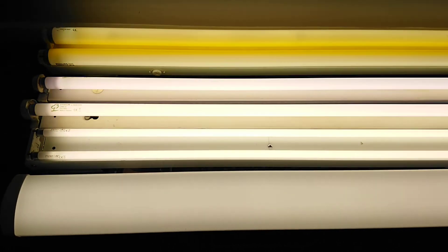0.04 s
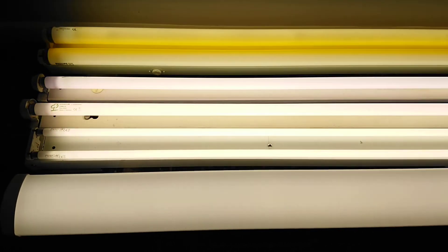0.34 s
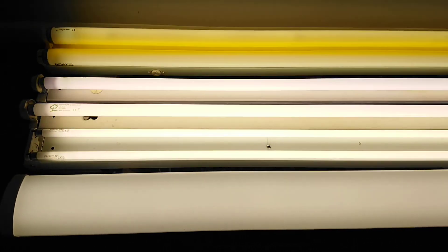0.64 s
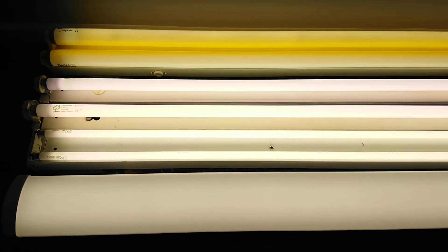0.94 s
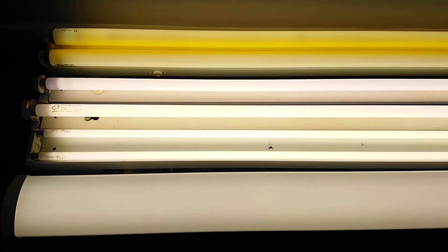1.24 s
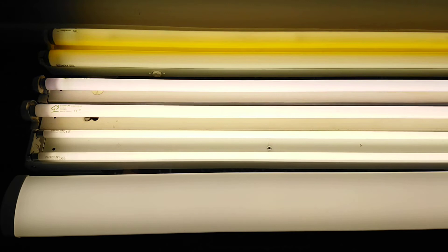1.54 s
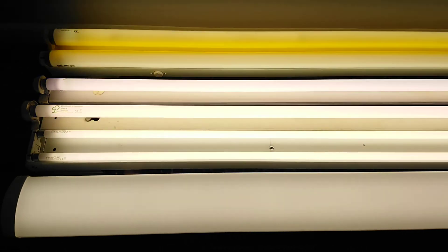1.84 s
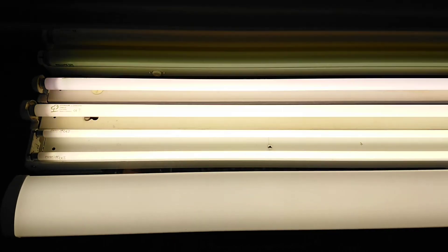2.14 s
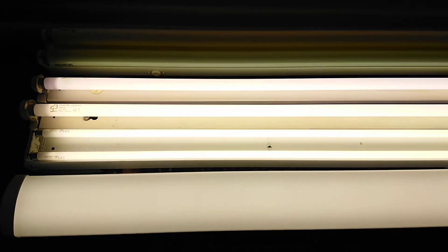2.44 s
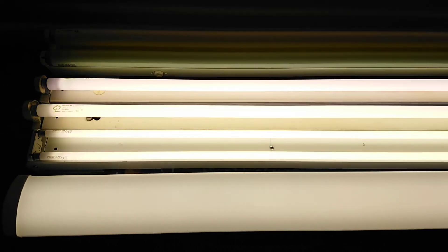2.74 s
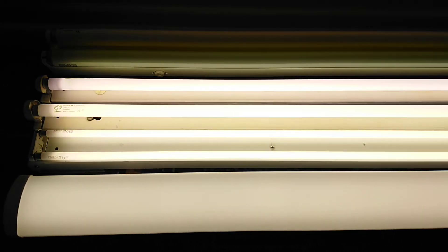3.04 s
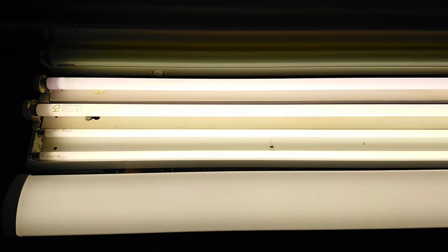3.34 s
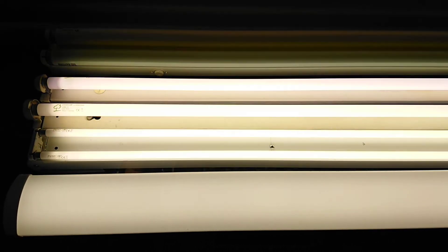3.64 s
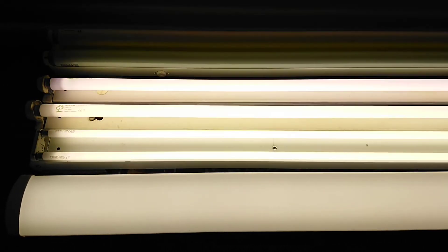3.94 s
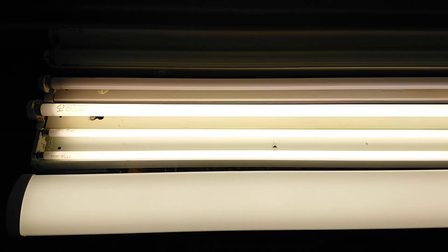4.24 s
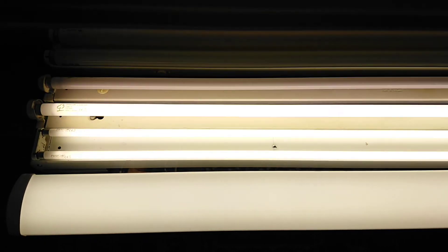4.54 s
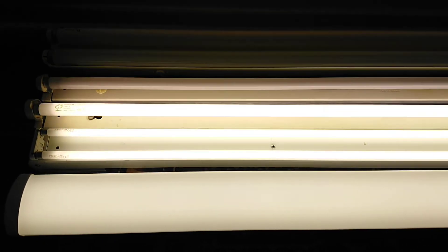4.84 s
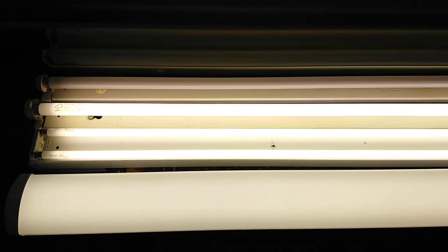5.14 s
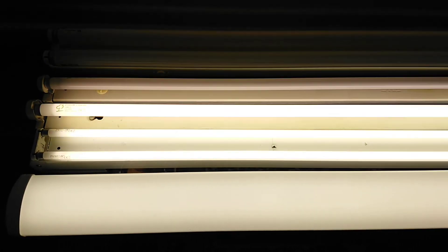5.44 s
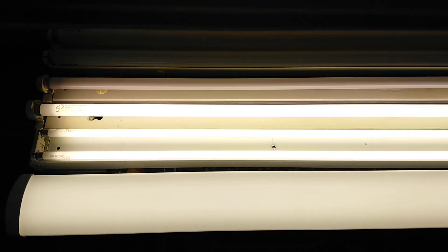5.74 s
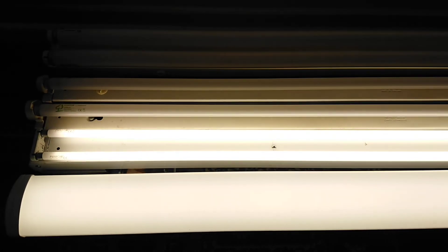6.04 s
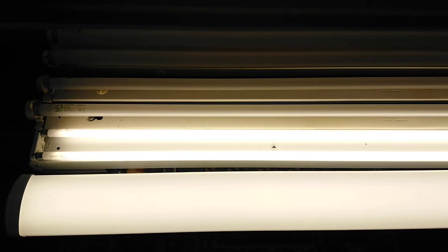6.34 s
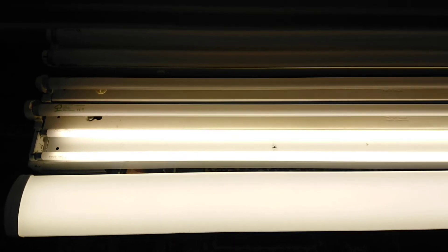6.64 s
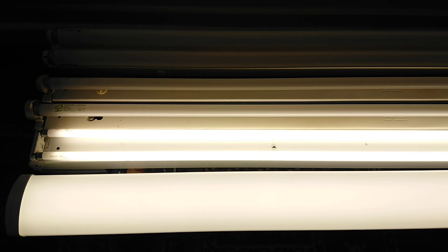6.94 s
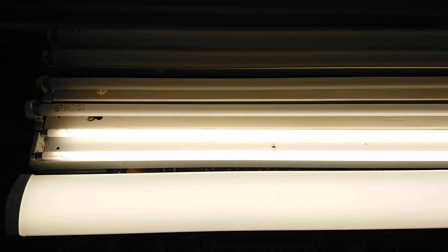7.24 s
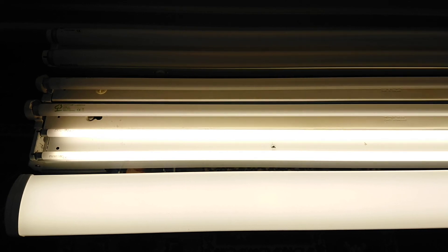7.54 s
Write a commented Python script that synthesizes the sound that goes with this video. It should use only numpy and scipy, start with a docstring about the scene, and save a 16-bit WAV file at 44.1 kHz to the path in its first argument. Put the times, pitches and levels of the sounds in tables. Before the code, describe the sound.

Close by in a small room, fingers brush a switch panel and a rocker switch snaps loudly with a short echo. A few seconds later a hand knocks lightly on the panel and a toggle switch clicks over twice, its spring ringing briefly each time. Behind it all lie a quiet fluorescent hum, low rumble, hiss and a faint high whine.

```python
"""Switching off fluorescent lights

In a small, hard room a rocker switch snaps, then a toggle with a ringing spring snaps twice.
Fingers brush the switches and knock on the panel. The lamps' ballasts (iron-cored coils) hum
over a low rumble, and a camera's electronics add a faint whine and hiss."""
import sys
import numpy as np
from scipy import signal
from scipy.fft import rfft, irfft
from scipy.io import wavfile
from scipy.ndimage import uniform_filter1d

SR = 44100
rng = np.random.default_rng(int(sys.argv[2]) if len(sys.argv) > 2 else 0)


def digitize_waveform(pressure):
    """Quantize a signal to 16-bit integers and store it at the path in sys.argv[1].

    Rows of a 2-D input are taken as channels; values are limited to [-1, 1].
    """
    field = np.atleast_2d(pressure).T
    bounded = np.clip(field, -1, 1)
    quanta = np.round(bounded * 32767).astype(np.int16)
    wavfile.write(sys.argv[1], SR, quanta)


N = 338908
TIME = np.arange(N) / SR
MAINS_HZ, WHINE_HZ = 60, 730.5

# The room's echo. Each row: frequency in Hz, seconds to fade by 60 dB.
ECHO_FADE = [(100, 0.45), (500, 0.37), (1500, 0.34), (4500, 0.41), (8000, .32), (15000, 0.39)]
# How alike left and right sound. Each row: frequency in Hz, likeness from 0 to 1.
STEREO_LIKENESS = [(60, 0.85), (300, 0.54), (550, 0.78), (1000, 0), (2000, 0.66), (15000, 0.27)]
# Tone of the echo, rumble, hiss and two microphone openings. Each row: frequency in Hz, gain in dB.
ECHO_TONE = [(100, 9), (700, 4.5), (1500, -0.5), (3000, 2.5), (15000, 0)]
RUMBLE_TONE = [(25, -39), (40, -21.5), (56, 1), (72, -1), (100, -4), (150, -0.5), (190, -9), (280, -15),
               (450, -20), (1100, -22), (2500, -32)]
HISS_TONE = [(300, 1.5), (800, 11), (1600, 6.5), (2500, 7.5), (4500, 7), (7000, 5), (8000, -10.5),
             (9500, -2), (11500, -9), (13400, -6.5), (15000, -3)]
LEFT_MIC_TONE = [(100, -4.5), (400, 3.5), (1000, 0.5), (2000, 4), (4500, -13), (7000, 6), (9000, 6),
                 (15000, -4.5)]
RIGHT_MIC_TONE = [(100, 1.5), (400, 0.5), (1000, 4.5), (2000, 5), (4500, 5), (7000, -3), (9000, -13.5),
                  (15000, -2.5)]
# Stretches of louder rumble and hiss. Each row: start and end in seconds.
LOUDER_SPANS = [(-.1, 1.2), (1.68, 2.42), (3.35, 4.3), (4.5, 5.28), (5.68, 6.53)]
# The tones in the whine and the hum. Each row: multiple of WHINE_HZ or MAINS_HZ, relative level in dB.
WHINE_HARMONICS = [(1, 0.5), (2, -0.5), (3, -2.5), (4, -6), (5, -11), (6, -20), (7, -15.5), (8, -15.5),
                   (9, -23)]
HUM_HARMONICS = [(2, 1.5), (4, -16.5), (6, -22)]
# Brief dips in the whine. Each row: middle and length in seconds.
WHINE_DIPS = [(0.108, 0.025), (1.363, 0.026), (2.629, 0.04), (3.271, 0.023), (6.748, 0.013), (7.048, 0.026)]
# The hum swells and sinks. Each row: time in seconds, level in dB.
HUM_SWELLS = [(0.0, -68.5), (0.04, -64), (1.45, -75.5), (1.77, -65.5), (2.33, -65.5), (2.5, -75.5),
              (2.95, -72), (2.99, -82), (3.51, -66), (3.55, -72), (3.78, -65.5), (5.28, -71), (5.35, -76.5),
              (5.73, -66), (6.67, -67.5), (7.16, -81.5), (7.44, -73), (7.68, -74)]
# Finger strokes. Each row: middle in seconds, length in seconds, level in dB.
FINGER_STROKES = [(.07, .06, -66.5), (0.74, 0.019, -54), (1.796, 0.27, -64.5), (2.378, 0.092, -65),
                  (2.626, 0.064, -68.5), (2.794, 0.17, -70.5)]
# Knocks on the panel and the board behind it. Each row: start in seconds, rattle time in seconds,
# panel level in dB, board level in dB, pitch factor for the panel.
HAND_KNOCKS = [(3.8173, 0.0031, -50, -65, 0.925), (4.035, 0.0019, -50, -63, 0.91),
               (4.29, .009, -73, -66, 0.93), (4.5115, 0.0071, -40.5, -50, 0.9),
               (4.555, 0.0053, -50.5, -52, 1.07), (4.59, 0.0064, -58, -55.5, 0.96),
               (4.88, 0.016, -57, -69.5, 1.02), (4.925, 0.0093, -61, -64, 1.22),
               (5.255, 0.012, -74, -70, 1.1), (5.706, 0.0084, -53.5, -61, 1.18),
               (5.782, 0.0051, -49.5, -52.5, 1.06), (5.797, 0.0085, -57, -57.5, 1.03),
               (5.85, 0.0036, -55.5, -50, 1.27), (6.052, .002, -68, -60, 1.36),
               (6.125, 0.0021, -51, -58.5, 1.44), (6.212, 0.0072, -65, -84, 1.24),
               (6.33, 0.038, -63, -61, 1.22)]
# Modes, the tones a struck part rings at. Each row: frequency in Hz, width in Hz, relative level in dB.
PANEL_MODES = [(667, 160, -5), (926, 72, 0.5), (1070, 135, 4.5), (1376, 260, 3.5), (2080, 350, -2.5),
               (2870, 890, -2), (3560, 1000, 1.5), (4640, 460, 0.5), (5190, 150, 0), (6660, 280, -2),
               (9900, 920, -29)]
BOARD_MODES = [(163, 15, -10), (229, 54, -7.5), (365, 68, -7), (493, 56, -3), (618, 103, 6), (641, 89, 6),
               (778, 85, -3.5)]
ROCKER_MODES = [(245, 27, -30.5), (431, 54, -24), (484, 40, -17), (540.6, 31, -17.5), (903, 120, -21),
                (1490, 200, -17), (2070, 230, -13.5), (2440, 480, -15.5), (2940, 160, -14.5),
                (3670, 260, -9), (4350, 229, -3.5), (4840, 320, 0.5), (5700, 440, -1), (5960, 280, -1.5),
                (6750, 400, -8), (7350, 370, -12.5), (8850, 490, -18), (9360, 500, -19.5),
                (10760, 630, -25), (13100, 1000, -29.5), (15200, 1300, -16.5)]
TOGGLE_MODES = [(1430, 180, -7), (2154, 100, -8.5), (2540, 160, -14.5), (3180, 270, -12), (3580, 290, -5),
                (4370, 410, -3), (4890, 280, 1.5), (5646, 210, 6.5), (6490, 110, -1), (7090, 170, -4.5),
                (9100, 260, -12), (9300, 440, -15), (10850, 300, -12.5), (12900, 900, -25),
                (14900, 1000, -12)]
SPRING_MODES = [(2000, 21, -18), (4870, 13, -1), (5007, 9.7, 2), (5150, 5.1, -6), (5000, 15, -3),
                (5860, 40, -18), (6960, 18, -13)]
# Hits on the switch parts, and thin plastic ticks close to the microphone.
# Each row: start in seconds, rattle time in seconds, level in dB, brightness in dB per octave.
ROCKER_HITS = [(.736, 0.0045, -52, 1.5), (1.131, 0.0043, -59.5, -2.5), (1.8625, 0.0037, -23.5, .5),
               (1.8648, .0034, -24.5, 0.5), (4.0355, 0.0026, -55, 7), (5.466, .012, -65, -1.5),
               (5.679, 0.0035, -55.5, 1), (5.693, 0.0099, -55, -3), (5.781, 0.005, -50.5, -3)]
TOGGLE_HITS = [(4.3945, 0.005, -43, 3), (4.5085, .003, -44, 3), (4.5115, 0.0023, -32, -2.5),
               (4.757, .004, -65, -4), (4.822, .0067, -62, -11), (4.903, .0061, -59, 3),
               (4.925, 0.0061, -58, 8), (5.848, 0.0047, -44, -6), (6.124, 0.0032, -49.5, -6),
               (6.292, 0.0061, -61, 2), (6.34, .016, -67, 10)]
SPRING_HITS = [(4.3945, .00086, -49, 23), (4.5115, 0.00092, -61, -13), (4.602, 0.00085, -57, -10),
               (5.848, .00086, -54.5, -8)]
PLASTIC_TICKS = [(4.0355, .001, -62, 11), (4.092, 0.0011, -52.5, 12.5), (4.0995, .002, -57, 16)]
# Small metal parts. Each row: start in seconds, pitch in Hz, seconds to fade by 60 dB, level in dB.
METAL_PINGS = [(4.902, 5830, .08, -56), (4.925, 5800, 0.08, -61), (4.925, 7080, 0.06, -57),
               (4.941, 2700, 0.35, -63.5), (5.849, 5000, 0.23, -49), (5.848, 3734, 0.14, -50.5),
               (6.126, 1570, .16, -51), (6.125, 4390, 0.035, -42.5), (6.126, 3184, 0.33, -64),
               (6.125, 3880, 0.22, -60), (6.35, 4560, .4, -70)]


def from_db(db):
    """Turn decibels into a gain."""
    return 10 ** (np.asarray(db) / 20)


def unit_level(x):
    """Scale a sound to an average (rms) level of 1."""
    return x / np.sqrt(np.mean(x ** 2) + 1e-20)


def at_hz(table, hz):
    """Read between a table's rows, with octaves evenly spaced."""
    row_hz, values = np.transpose(table)
    return np.interp(np.log(np.maximum(hz, 1)), np.log(row_hz), values)


def coloured(x, tone):
    """Filter a sound to follow a tone table."""
    size = 8192
    gains = from_db(at_hz(tone, np.fft.rfftfreq(size, 1 / SR)))
    cepstrum = irfft(np.log(gains))
    # fold it so the filter rings only after a sound, never before
    cepstrum[1:size // 2] *= 2
    cepstrum[size // 2 + 1:] = 0
    response = irfft(np.exp(rfft(cepstrum)))
    return signal.fftconvolve(x, response)[:len(x)]


def resonate(x, hz, width_hz):
    """Ring at one pitch; the narrower the width, the longer it rings."""
    decay = np.exp(-np.pi * abs(width_hz) / SR)
    feedback = [1, -2 * decay * np.cos(2 * np.pi * hz / SR), decay * decay]
    return unit_level(signal.lfilter([1, 0, -1], feedback, x))


def stereo_noise(size):
    """White noise at two close microphones, most alike in the bass."""
    mid, side = rfft(rng.standard_normal((2, size)))
    alike = at_hz(STEREO_LIKENESS, np.fft.rfftfreq(size, 1 / SR))
    return irfft(np.sqrt(1 + alike) * mid + np.sqrt(1 - alike) * side * [[1], [-1]], size)


def room_echo(build_s):
    """Reflections build up quickly, then each frequency band fades at its own rate."""
    size = SR // 2
    t, hz = TIME[:size], np.fft.rfftfreq(size, 1 / SR)
    spectrum = rfft(stereo_noise(size))
    build_up = 1 - np.exp(-(t / build_s) ** 2)
    edges, echo = np.geomspace(60, SR / 2, 34), 0
    for low, high in zip(edges, edges[1:]):
        centre = np.sqrt(low * high)
        fade = from_db(-60 * t / at_hz(ECHO_FADE, centre))
        band = irfft(spectrum * ((hz >= low) & (hz < high)), size)
        gain = from_db(at_hz(ECHO_TONE, centre)) * np.sqrt(2 * (high - low) / SR / size)
        echo += gain * unit_level(band * build_up * fade)
    return echo


def in_room(x, echo, direct_db, echo_db):
    """Sound reaches the right microphone first; the room echoes in both."""
    lag = 13   # samples
    direct = np.array([np.pad(x, (lag, 0))[:N], x])
    reflected = signal.oaconvolve(x[None], echo, axes=1)[:, :N]
    return from_db(direct_db) * direct + from_db(echo_db) * reflected


def noise_rise(ramp_s):
    """Slide between 0 (quiet background) and 1 (louder background)."""
    return sum(np.clip(np.minimum(TIME - start, end - TIME) / ramp_s + .5, 0, 1)
               for start, end in LOUDER_SPANS)


def low_rumble(hum_db, rise):
    """Deep noise that steps up and down and partly follows the hum's level."""
    level_db = -68.5 + 0.29 * (hum_db - hum_db.mean()) + 4 * rise
    noise = np.array([coloured(side, RUMBLE_TONE) for side in stereo_noise(N)])
    return from_db(level_db) * unit_level(noise)


def camera_hiss(rise):
    """The electronics hiss separately on each side."""
    noise = np.array([coloured(side, HISS_TONE) for side in rng.standard_normal((2, N))])
    return from_db(-69.5 + 4 * rise) * unit_level(noise)


def camera_whine(rise, wobble, dip_db):
    """A thin electronic tone that wobbles, swells with the hiss and dips now and then."""
    phase = 2 * np.pi * WHINE_HZ * TIME + wobble * np.sin(2 * np.pi * MAINS_HZ * TIME)
    tone = sum(from_db(db) * np.sqrt(2) * np.sin(multiple * phase + 2 * np.pi * rng.random())
               for multiple, db in WHINE_HARMONICS)
    dipping = sum(abs(TIME - middle) < length / 2 for middle, length in WHINE_DIPS)
    dips = uniform_filter1d(from_db(dip_db * dipping), size=128)
    return from_db(-68 + 1.88 * rise) * tone * dips


def ballast_hum(hum_db, waver):
    """Iron cores flex at twice the mains frequency; the hum wavers a little."""
    sway_times = np.arange(0, TIME[-1] + 1, 0.1)
    sway = np.interp(TIME, sway_times, rng.standard_normal(len(sway_times)))
    phase = 2 * np.pi * MAINS_HZ * TIME + waver * sway
    tone = sum(from_db(db) * np.sqrt(2) * np.sin(multiple * phase) for multiple, db in HUM_HARMONICS)
    return from_db(hum_db - 0.3) * tone


def finger_brushes():
    """Skin rubs on plastic: fine noise that swells and fades with each stroke."""
    friction = rng.standard_normal(N)
    for _ in range(2):
        friction = resonate(friction, hz=4960, width_hz=1600)
    return friction * sum(from_db(db) * np.exp(-(2 * (TIME - middle) / length) ** 2)
                          for middle, length, db in FINGER_STROKES)


def strike(modes, taps_per_s, impact, grit, rattle_s, db, brightness, pitch=1):
    """One impact and a dying rattle of tiny taps make a part ring."""
    size = SR // 3
    taps = rng.choice([-1, 1], size) * (rng.random(size) < taps_per_s / SR)
    taps = taps + grit * rng.standard_normal(size)
    taps[0] = impact
    force = taps * np.exp(-np.minimum((TIME[:size] / rattle_s) ** 2, 30))
    hz, width, mode_db = np.transpose(modes)
    shares = from_db(mode_db + brightness * np.log2(hz))   # tilt toward the high or low modes
    ring = sum((-1) ** k * shares[k] * resonate(force, hz[k] * pitch, width[k]) for k in range(len(hz)))
    gain = from_db(db) * np.sqrt(0.02 * SR / size)   # db counts the energy as if spread over 20 ms
    return gain * unit_level(ring / shares.max())


def struck(hits, modes, taps_per_s, impact, grit):
    """All the hits on one part, each at its moment."""
    track = np.zeros(N + SR)
    for start_s, *hit in hits:
        sound = strike(modes, taps_per_s, impact, grit, *hit)
        start = round(start_s * SR)
        track[start:start + len(sound)] += sound
    return track[:N]


def plastic_ticks(echo):
    """Thin, dry ticks sound close to the microphone."""
    ticks = struck(PLASTIC_TICKS, ROCKER_MODES, taps_per_s=1500, impact=0.9, grit=0.15)
    return in_room(ticks, echo, direct_db=-2.5, echo_db=-8.5)


def hand_knocks(echo):
    """A hand knocks on the panel, and the board behind it thuds."""
    start_s, rattle_s, panel_db, board_db, pitch = np.transpose(HAND_KNOCKS)
    panel_brightness = -1.5 - 6.5 * np.log2(pitch)   # stiffer spots ring higher but duller
    board_brightness = 5.5 - 0.56 * (board_db - board_db.mean())   # harder knocks sound deeper
    board_rattle_s = 1.35 * rattle_s   # the heavy board settles more slowly
    panel_hits = zip(start_s, rattle_s, panel_db, panel_brightness, pitch)
    board_hits = zip(start_s, board_rattle_s, board_db, board_brightness)
    panel = struck(panel_hits, PANEL_MODES, taps_per_s=1200, impact=0.38, grit=0.13)
    board = struck(board_hits, BOARD_MODES, taps_per_s=1100, impact=0.74, grit=0.21)
    return (in_room(panel, echo, direct_db=-5, echo_db=-4.5)
            + in_room(board, echo, direct_db=1.5, echo_db=0.5))


def metal_pings():
    """Small metal parts ring on as single fading tones."""
    track, t = np.zeros(N), TIME[:SR // 2]
    for start_s, hz, fade_s, db in METAL_PINGS:
        start = round(start_s * SR)
        track[start:start + len(t)] += from_db(db - 60 * t / fade_s) * np.sin(2 * np.pi * hz * t)
    return track


def toggle_switch(echo):
    """The toggle snaps over; its spring and small metal parts ring."""
    clicks = struck(TOGGLE_HITS, TOGGLE_MODES, taps_per_s=1400, impact=0.62, grit=0.063)
    spring = struck(SPRING_HITS, SPRING_MODES, taps_per_s=600, impact=0.82, grit=0.11)
    return (in_room(clicks, echo, direct_db=-1.2, echo_db=-5)
            + in_room(spring + metal_pings(), echo, direct_db=2, echo_db=-7))


def rocker_switch(echo):
    """The rocker gives one sharp snap and softer clicks."""
    clicks = struck(ROCKER_HITS, ROCKER_MODES, taps_per_s=2100, impact=0.42, grit=0.41)
    return in_room(clicks, echo, direct_db=-2, echo_db=-2.5)


def scene():
    """The room's sounds pass through two microphone openings; hiss and whine join afterwards."""
    hum_db = np.interp(TIME, *np.transpose(HUM_SWELLS))
    rise = noise_rise(ramp_s=0.059)
    background = ballast_hum(hum_db, waver=0.23) + low_rumble(hum_db, rise)
    echo = room_echo(build_s=0.0013)
    clicks = rocker_switch(echo) + plastic_ticks(echo) + toggle_switch(echo)
    hand = hand_knocks(echo) + in_room(finger_brushes(), echo, direct_db=-2, echo_db=-2.5)
    left, right = background + hand + clicks
    room = np.array([coloured(left, LEFT_MIC_TONE), coloured(right, RIGHT_MIC_TONE)])
    hiss = camera_hiss(rise) * from_db([[-1.2], [1.2]])
    whine = camera_whine(rise, wobble=0.16, dip_db=-33) * from_db([[-26], [0]])   # mostly on the right
    return room + hiss + whine


def record(dry):
    """Cut the treble steeply above 16000 Hz."""
    return signal.sosfilt(signal.ellip(12, .1, 80, 16000, fs=SR, output="sos"), dry)


dry = scene()
out = record(dry)
digitize_waveform(out)
```